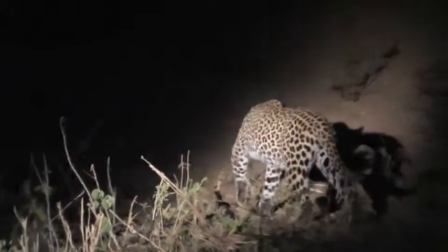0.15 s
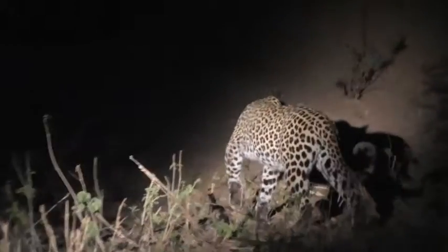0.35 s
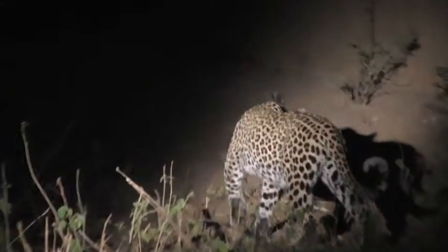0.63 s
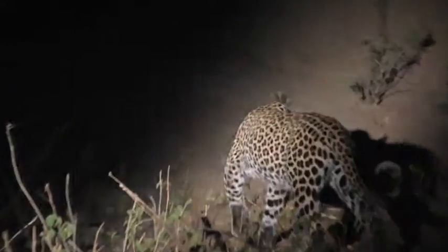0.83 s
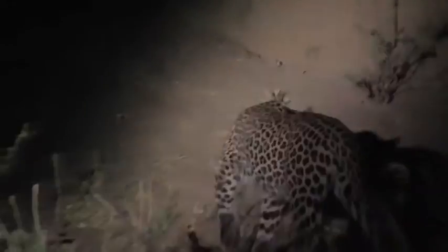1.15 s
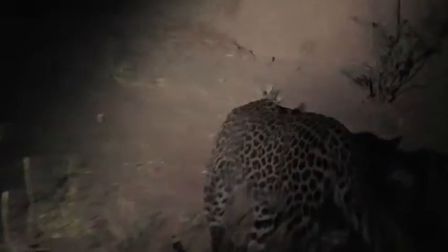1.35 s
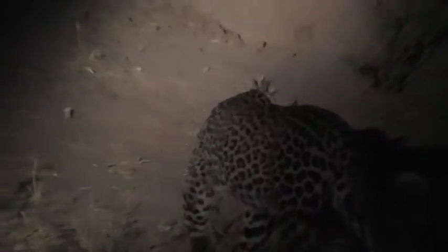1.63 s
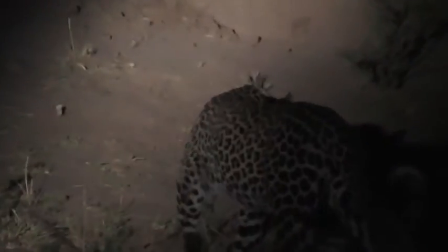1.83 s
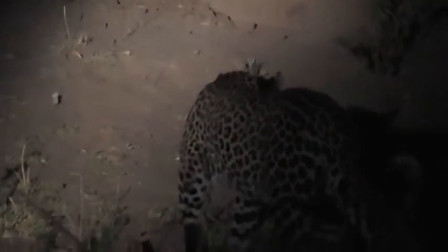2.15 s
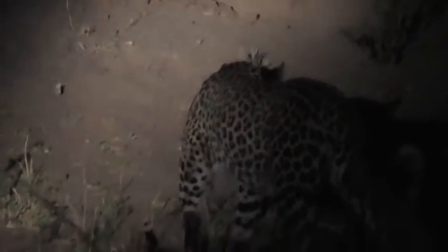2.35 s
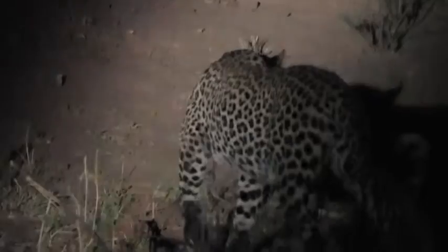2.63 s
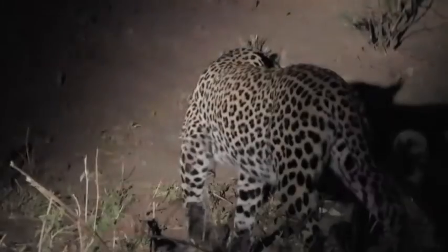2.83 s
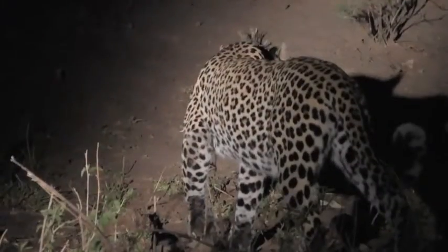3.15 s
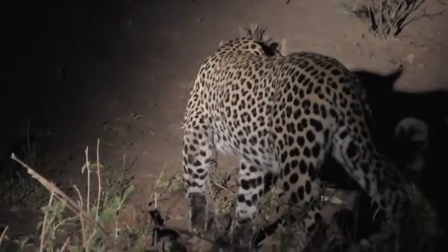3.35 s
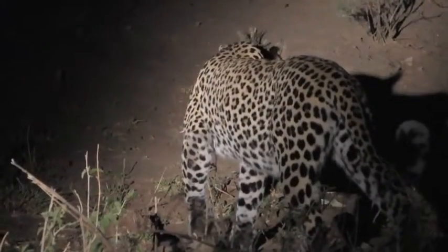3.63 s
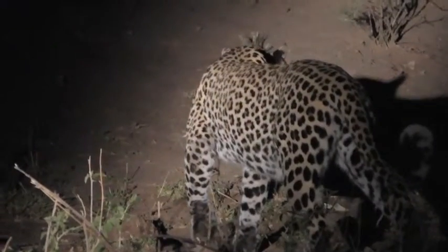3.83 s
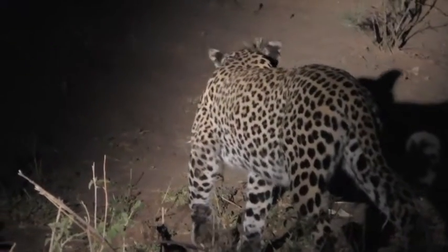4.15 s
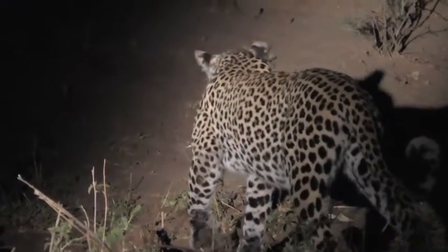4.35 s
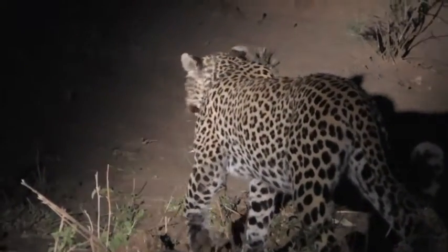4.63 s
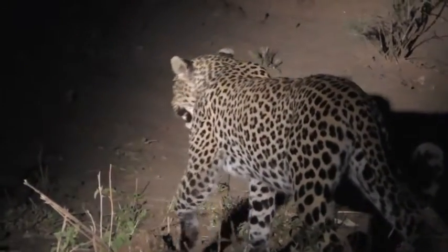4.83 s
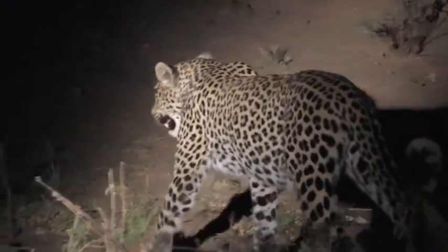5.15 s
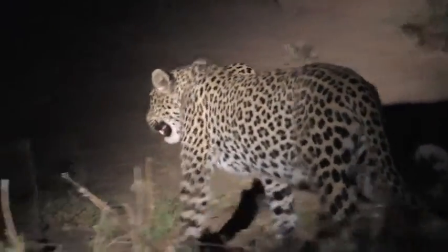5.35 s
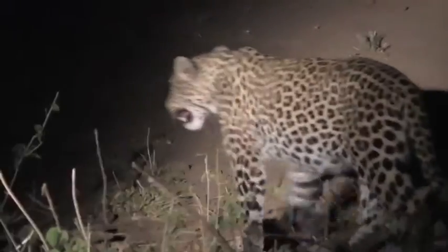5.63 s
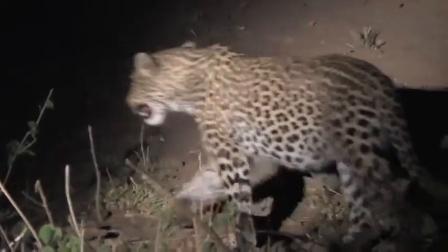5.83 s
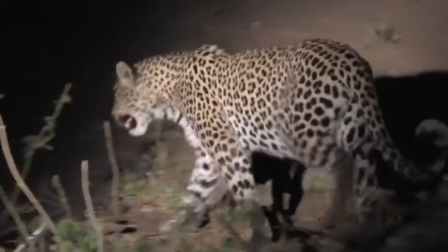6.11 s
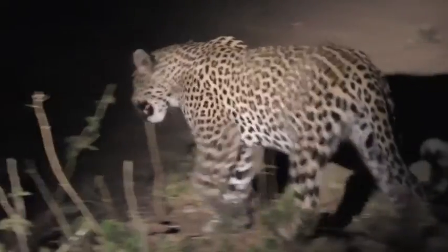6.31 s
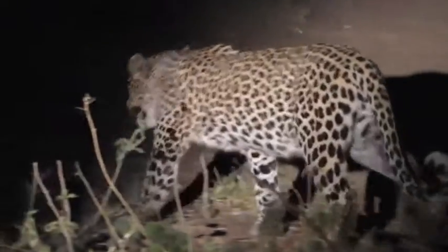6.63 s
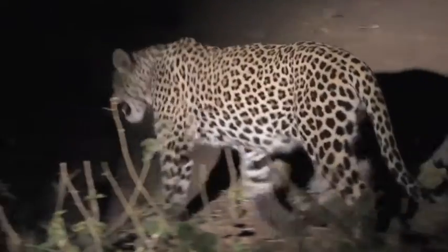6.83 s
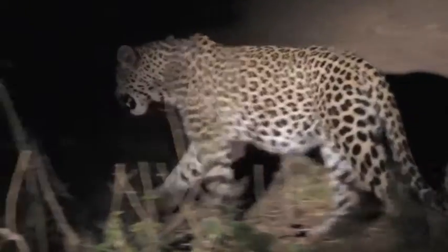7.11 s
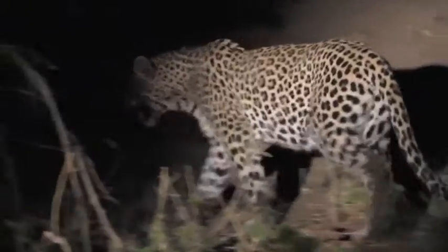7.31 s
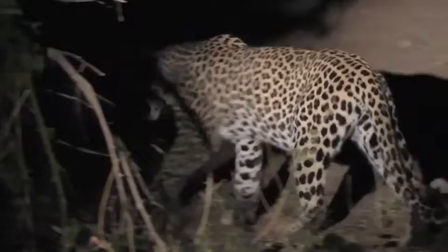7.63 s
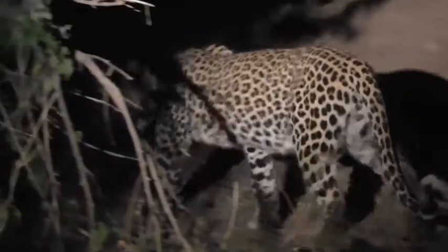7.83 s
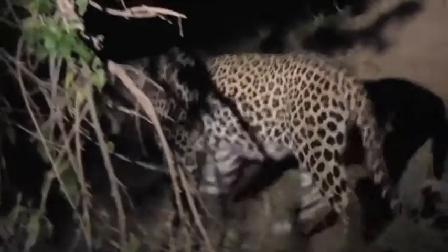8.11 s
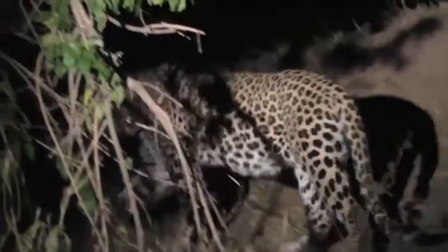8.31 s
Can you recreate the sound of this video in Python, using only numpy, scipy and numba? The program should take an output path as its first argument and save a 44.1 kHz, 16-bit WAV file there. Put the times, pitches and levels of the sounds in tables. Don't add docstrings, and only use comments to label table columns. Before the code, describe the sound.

Outdoors at night, a leopard a few metres away, slightly right of centre, alternates three deep pulsing roars with rattling drawn breaths, ending in a weak rattle and grunt by three seconds. Soft insect hiss, low traffic rumble, a faint descending bird trill and katydid buzzing surround it. A distant vehicle changes gear, then a still camera on the left fires three quick shots and one later.

```python
import sys
import numpy as np
from scipy import signal
from scipy.fft import rfft, irfft, next_fast_len
from scipy.io import wavfile
from scipy.ndimage import uniform_filter1d, map_coordinates
from numba import njit

SR = 44100
rng = np.random.default_rng(int(sys.argv[2]) if len(sys.argv) > 2 else 0)


def master_out(mix):
    frames = np.transpose(np.atleast_2d(mix))
    ceiling = np.clip(frames, -1, 1)
    pcm = np.round(ceiling * 32767).astype(np.int16)
    wavfile.write(sys.argv[1], SR, pcm)


def gain_from_db(level_db):
    decades = np.asarray(level_db, float) / 20
    return 10 ** decades


N = 373527
TIME = np.arange(N) / SR


def unit(x):
    return x / np.sqrt(np.mean(x ** 2) + 1e-20)


def levelled(x, span_s):
    return x / np.sqrt(np.abs(uniform_filter1d(x ** 2, int(span_s * SR))) + 1e-12)


def along(points, hz):
    f, v = np.transpose(points)
    return np.interp(np.log(hz + 1), np.log(f + 1), v)


def curves(rows):
    s, *columns = np.transpose(rows)
    return [np.interp(TIME, s, c) for c in columns]


def during(tables, fade_s):
    return sum(np.clip(np.minimum(TIME - t[0][0], t[-1][0] - TIME) / fade_s, 0, 1) for t in tables)


def swells(rows, rise_db, fall_db):
    gain = 0
    for start, loudest, end, db in rows:
        shape_db = np.interp(TIME, [start, loudest, end], [-rise_db, 0, -fall_db])
        gain = gain + gain_from_db(db + shape_db) * during([[[start], [end]]], .006)
    return gain


def wobble(rate):
    return map_coordinates(rng.standard_normal(int(N * rate / SR) + 4), [TIME * rate])


def phase(hz):
    return 2 * np.pi * np.cumsum(hz) / SR


def filtered(x, response):
    m = next_fast_len(N + SR // 2)
    return irfft(rfft(x, m) * response(np.fft.rfftfreq(m, 1 / SR)), m)[..., :N]


def hiss(spectrum):
    return unit(filtered(rng.standard_normal(N), lambda hz: gain_from_db(along(spectrum, hz))))


def band(hz, width_hz):
    return unit(filtered(rng.standard_normal((2, N)), lambda f: np.exp(-((f - hz) / width_hz) ** 2)))


@njit
def ringing(x, turn, keep):
    out, state = np.zeros(len(x)), 0j
    for i in range(len(x)):
        state = state * keep * np.exp(1j * turn[i]) + (1 - keep) * x[i]
        out[i] = state.real
    return out


def resonance(x, hz, width_hz):
    return 2 * ringing(x, 2 * np.pi * hz / SR, np.exp(-np.pi * width_hz / SR))


# frequency in Hz, likeness from -1 to 1.
LIKENESS = [(60, 0.068), (150, 0.58), (380, 0.25), (950, 0.18), (2380, -0.39), (5980, 1), (15000, 0.76)]


def rush(spectrum, patchy_db):
    z = signal.stft(rng.standard_normal((2, N)), nperseg=512)[2]
    field = uniform_filter1d(rng.standard_normal(z.shape[1:]), size=5, axis=0)
    field = uniform_filter1d(field, size=12, axis=1)
    pair = signal.istft(z * gain_from_db(patchy_db * unit(field)), nperseg=512)[1][:, :N]

    def mid_side(hz):
        turn = np.arccos(np.clip(along(LIKENESS, hz), -1, 1)) / 2
        return gain_from_db(along(spectrum, hz)) * [np.cos(turn), np.sin(turn)]

    mid, side = filtered(pair, mid_side)
    return unit(np.array([mid + side, mid - side]))


# time in seconds, level in dB.
TRAFFIC = [(0, -48), (2, -48.5), (3.3, -53), (4.4, -53.5), (5, -51), (8.47, -51)]
# frequency in Hz, density in dB per Hz.
RUMBLE = [(12, -29), (20, -11.5), (129, 0.5), (183, 2.5), (286, -1.5), (499, -12), (604, -20.5), (720, -12),
          (818, -48.5), (900, -45.5), (1170, -78), (1980, -120)]
# frequency in Hz, density in dB per Hz.
INSECTS = [(350, -30), (600, -32.5), (717, -14.5), (822, -4), (1670, -2), (2140, 1), (2560, -4),
           (4130, -12.5), (5430, -11), (7860, -20), (15800, -18)]
# centre in Hz, width in Hz, level in dB.
CHORUSES = [(757, 54, -78), (2150, 124, -64), (3710, 60, -79.5), (5020, 680, -66)]
# start in seconds, loudest in seconds, end in seconds, level in dB.
GRASS = (1.68, 1.715, 1.77, -52)


def night():
    traffic_db, = curves(TRAFFIC)
    rumble = gain_from_db(traffic_db + 0.9 * wobble(3.2)) * rush(RUMBLE, patchy_db=1.3)
    insects_db = -57 + 0.47 * (traffic_db - traffic_db.mean())
    insects = gain_from_db(insects_db + 0.27 * wobble(2.1)) * rush(INSECTS, patchy_db=1.83)
    choruses = sum(gain_from_db(db + .9 * wobble(3.33)) * band(hz, width) for hz, width, db in CHORUSES)
    crickets_db = -73.5 - 7 * (TIME < .7)
    crickets = gain_from_db(crickets_db + 0.48 * wobble(1.5)) * band(hz=7070, width_hz=740)[0]
    grass = swells([GRASS], rise_db=10, fall_db=38) * band(hz=8600, width_hz=3500)
    return rumble + insects + choruses + crickets + grass


# time in seconds, peak level in dB, ring in Hz.
FLAPS = [(0.009, -14, 200), (0.05, -12.5, 198), (0.471, -29, 211), (0.534, -32, 208), (0.577, -28.5, 159),
         (0.6, -22, 197), (0.649, -18, 190.5), (0.68, -16, 208), (0.711, -15.5, 193), (0.741, -11, 196),
         (0.769, -10, 204), (0.818, -17.5, 197), (1.305, -32, 224), (1.387, -23, 191), (1.437, -18, 206),
         (1.475, -15, 200), (1.51, -15.5, 189), (1.554, -12.5, 199.7), (1.588, -18.5, 197),
         (2.18, -25.5, 205.5), (2.244, -29, 195), (2.304, -21.5, 203), (2.351, -24, 197), (2.412, -25, 198),
         (2.532, -24.5, 200), (2.68, -25.5, 159), (2.709, -24, 191), (2.748, -22, 161), (2.784, -35.5, 171),
         (2.869, -38.5, 193)]


def flaps():
    rings, puffs, t = np.zeros(N), np.zeros(N), np.arange(SR // 8) / SR
    limp_s = 2.1

    def mode(hz, t60):
        return np.sin(2 * np.pi * hz * t) * gain_from_db(-60 * t / t60)

    for s, peak_db, hz in FLAPS:
        ring = gain_from_db(2.5) * mode(hz, .058) if s > limp_s else mode(hz, .105)
        ring += 0.11 * mode(1.725 * hz, 0.096) + 0.18 * mode(hz / 2, 0.13) + 0.038 * mode(2.2 * hz, 0.062)
        at = round(s * SR)
        rings[at:][:len(t)] *= np.exp(-t / 0.004)
        rings[at:][:len(t)] += gain_from_db(peak_db - 0.5) * ring * (1 - np.exp(-t / 0.0019))
        puffs[at:][:len(t)] += gain_from_db(peak_db - 60 * t / 0.064) * (1 - np.exp(-t / 0.0026))
    return rings, puffs


# start in seconds, loudest in seconds, end in seconds, level in dB.
RASPS = [
    (-.2, .04, .1, -20),
    (.56, .78, 0.89, -22.5),
    (1.36, 1.55, 1.684, -22),
    (2.0, 2.45, 2.9, -39.5),
    (2.58, 2.72, 2.83, -38),
]
# frequency in Hz, density in dB per Hz.
BREATH = [(530, -48), (900, -68.5), (1110, 14.5), (1410, -69), (1740, 1), (1930, 0), (2630, 4.5),
          (3970, -7), (4310, -32), (4960, -22), (15000, -18.5)]


def rattles():
    cycles = np.cumsum(60 * gain_from_db(3 * wobble(30))) / SR
    lumps = .25 + np.exp(-3.5 * (cycles % 1))
    noise = lumps * rng.standard_normal(N)
    throat_hz = np.full(N, 197.)

    def twice(hz, first_width, then_hz, then_width):
        return resonance(resonance(noise, hz, first_width), then_hz, then_width)

    low = levelled(twice(throat_hz, 60, throat_hz, 115), .05)
    second = gain_from_db(-22) * unit(twice(3.25 * throat_hz, 90, 3.25 * throat_hz, 150))
    chest = gain_from_db(-27.5) * unit(resonance(noise, 0.7 * throat_hz, width_hz=23))
    mouth = gain_from_db(-16) * unit(twice(1.3 * throat_hz, 45, 1.4 * throat_hz, 110))
    breath = gain_from_db(-24) * unit((lumps + 0.32) * hiss(BREATH))
    rasp = gain_from_db(-7.5) * low + chest + gain_from_db(-5.5) * (second + mouth + breath)
    rings, puffs = flaps()
    splashes = gain_from_db(-31) * puffs * unit(1.7 * second + mouth + 1.2 * breath)
    return rings + swells(RASPS, rise_db=20.5, fall_db=17.5) * rasp + splashes


# start in seconds, length in seconds, top pitch in Hz, seconds to the top pitch,
# sag of the voice there in dB.
ROARS = [
    (.128, .325, 73.04, .178, 4.5),
    (.885, 0.34, 70.9, 0.21, 3),
    (1.668, .33, 68.76, .215, 0.5),
]
# seconds after the start, first resonance in Hz,
# second resonance in Hz, strength of the second in dB.
JAW = [(-.03, 206, 603, -2), (.025, 250, 657, -2.5), (.075, 251, 672, 3), (.135, 261, 650, -3),
       (.19, 237.5, 602, 3), (.245, 208, 570, -0.5), (.3, 186, 558, -13), (.34, 168, 542, -20)]


def effort():
    rows = np.array(ROARS)
    middle = rows[:, 0] + rows[:, 1] / 2
    start, length, top_hz, top, sag_db = rows[np.abs(TIME[:, None] - middle).argmin(axis=1)].T
    t = TIME - start
    tightens = np.sin(np.pi / 2 * np.clip(t / top, 0, 1))
    lets_go = np.cos(np.pi / 2 * np.clip((t - top) / (length - top), 0, 1)) ** 1.3
    slack = .735
    pitch = top_hz * (slack + (1 - slack) * tightens * lets_go)

    def blow(lead, end):
        attack = np.clip((t + lead) / 0.037 + 0.87, 0, 1) ** 1.8
        return attack * np.clip((end - t) / 0.084 + 0.26, 0, 1) ** 1.9

    voice = blow(0, length) * gain_from_db(-sag_db * np.exp(-((t - top) / .022) ** 2))
    mouth = blow(.008, length - 0.014)
    breath_grows_db = 13 * t
    s, *jaw = np.transpose(JAW)
    return pitch, voice, mouth, breath_grows_db, *[np.interp(t, s, c) for c in jaw]


# centre in Hz, width in Hz, level in dB.
UPPER_THROAT = [(838, 65, 3.5), (1067, 153, -4.5), (1469, 26, -1.5), (1840, 37, 1), (2105, 53, 1.5),
                (2395, 40, -2), (2694, 160, -10), (3050, 180, -11.5), (3800, 470, -21.5),
                (7740, 14000, -42)]


def upper_throat(x):
    out = 0
    for k, (c, w, db) in enumerate(UPPER_THROAT):
        mode = filtered(x, lambda f: 1j * f * w / (c * c - f * f + 1j * f * w))
        out = out + (-1) ** k * gain_from_db(db + 1.7 * wobble(25)) * mode
    return out


def roars():
    pitch, voice, mouth, grows_db, first_hz, second_hz, second_db = effort()
    cycles = np.cumsum(pitch * (1 + .014 * wobble(50))) / SR
    size = gain_from_db(1.5 * rng.standard_normal(int(cycles[-1]) + 1))[cycles.astype(int)]
    pulses = unit(np.diff(np.floor(cycles), prepend=0) * size)
    air = unit((1 + 0.75 * np.cos(2 * np.pi * (cycles - .15))) * rng.standard_normal(N))
    source = pulses + .18 * air
    first = source
    for width_hz in (68.5, 81, 320):
        first = resonance(first, first_hz, width_hz)
    skirt = gain_from_db(-30) * resonance(source, 1.3 * first_hz, width_hz=60)
    second = resonance(resonance(pulses + .4 * air, second_hz, width_hz=75), second_hz, width_hz=140)
    breath = unit(gain_from_db(1.8 * wobble(60)) * upper_throat(air + .16 * pulses))
    bright = gain_from_db(-18.5 + second_db) * levelled(second, 0.095) + gain_from_db(-26 + grows_db) * breath
    return gain_from_db(-20) * (voice * levelled(first + skirt, 0.035) + mouth * bright)


# time in seconds, pitch in Hz, level in dB.
TRILL = [(1.1, 3300, -72), (1.22, 3230, -53), (1.35, 3110, -65), (1.8, 2976, -56), (2.07, 2770, -53),
         (2.3, 2520, -51.5), (2.45, 2340, -54), (2.5, 2260, -55), (2.7, 2150, -74)]
# time in seconds, pitch in Hz, level in dB.
WHISTLE = [(.135, 3780, -71), (.155, 3350, -58), (.18, 3050, -57), (.21, 2770, -58.5)]


def birds():
    hz, db = curves(TRILL)
    beat = ((TIME - 2.072) * 13.8 + .5) % 1 - .5
    notes = np.exp(-(beat / .15) ** 2)
    dipping_hz = hz * (1 + 0.19 * np.abs(beat) - .02)
    trill = gain_from_db(db + 2.2 * wobble(83)) * notes * np.sin(phase(dipping_hz))
    hz, db = curves(WHISTLE)
    whistle = gain_from_db(db) * np.sin(phase(hz))
    return during([TRILL], 0.031) * trill + during([WHISTLE], .01) * whistle


# start in seconds, loudest in seconds, end in seconds, level in dB.
LONG_BUZZ = (1.2, 2.5, 2.9, -61.5)
# start in seconds, loudest in seconds, end in seconds, level in dB.
CHIRPS = [
    (2.97, 3.06, 3.11, -63.5),
    (3.19, 3.24, 3.4, -63),
    (3.72, 3.86, 3.92, -63.5),
    (4.3, 4.34, 4.38, -68),
    (4.39, 4.45, 4.49, -62.5),
]


def katydid():
    tires_s, slurs_s = 2.5, 2.93
    rate = np.where(TIME < slurs_s, 22.4 - 10 * np.clip(TIME - tires_s, 0, None), 22.4)
    blur = np.where(TIME < slurs_s, .35 + .6 * np.exp(-((TIME - tires_s) / .1) ** 2), 1.5)
    count = np.cumsum(rate) / SR
    strokes = blur + np.cos(np.pi * (count - count[round(2.005 * SR)])) ** 4
    strokes = strokes / np.sqrt(blur ** 2 + .75 * blur + 0.27)
    wing = [(9500, -24), (11300, -1), (12900, 6), (14400, -1), (16000, -11)]  # Hz, dB per Hz
    gain = swells([LONG_BUZZ], rise_db=13, fall_db=7) + swells(CHIRPS, rise_db=7, fall_db=6)
    return gain * gain_from_db(1.5) * strokes * np.array([hiss(wing), hiss(wing)])


# time in seconds, firing rate in Hz, level in dB, overtones in dB.
ENGINE = [(2.8, 93.26, -62.5, -2), (3.85, 92.07, -64.5, 8.5), (4, 89.9, -53, -7.5), (4.22, 80, -51.5, -4),
          (4.3, 75.6, -67, -23), (4.58, 71.94, -63, -22), (4.7, 81, -54, -16), (4.9, 92.3, -54.5, -3.5),
          (5.2, 102.7, -63.5, 4), (5.6, 118.7, -55, -1.5), (6, 126.5, -52, -19), (6.75, 140.9, -52.5, -10),
          (7, 136.5, -57, -11), (7.25, 138, -48, -6.5), (7.5, 147.6, -49, -13), (7.75, 138.2, -57.5, 3),
          (7.95, 136.3, -50, -10.5), (8.47, 142.3, -52, -19)]
# frequency in Hz, gain in dB.
EXHAUST = [(150, 4), (280, -1), (420, -16)]


def vehicle():
    hz, load_db, over_db = curves(ENGINE)
    turn = phase(hz * (1 + 0.0067 * wobble(9.1)))

    def order(k, db):
        return gain_from_db(load_db + db + 2.2 * wobble(9)) * np.sin(k * turn)

    tones = order(1, 0.5)
    tones += order(1.5, -9) * (hz > 115)
    tones += sum(order(k, over_db + along(EXHAUST, k * hz)) for k in (2, 3))
    return tones * np.clip((TIME - 2) / 0.79, 0, 1)


# start in seconds, wait from opening to closing in seconds.
SHOTS = [
    (5.3638, 0.078),
    (5.5897, 0.078),
    (5.8169, .077),
    (7.2262, 0.11),
]
# peak in seconds, bright level in dB, low level in dB,
# rise in seconds, t60 in seconds.
OPENING = [
    (.001, -38, -35.5, 0.00096, 0.021),
    (.004, -41, -38.5, 0.0018, 0.083),
    (.013, -35, -45, 0.0018, 0.015),
    (.023, -26, -44, 0.0017, 0.04),
    (0.027, -55, -32.5, .002, 0.029),
    (0.052, -43.5, -51, .002, 0.068),
    (.062, -54.5, -40.5, 0.0023, 0.039),
]
CLOSING = [
    (.001, -57, -49.5, .001, .03),
    (.006, -37, -47, .002, .03),
    (.010, -48, -34, .002, 0.022),
    (.017, -42, -40, 0.0034, .03),
    (0.021, -27, -44.5, 0.0039, 0.045),
    (.036, -25, -31.5, .0015, 0.019),
    (.040, -25, -35, 0.0042, .04),
    (0.053, -38.5, -39.5, 0.0018, 0.031),
    (.077, -44, -48, 0.0029, 0.066),
    (.091, -52, -46.5, 0.0016, 0.025),
]
# frequency in Hz, density in dB per Hz.
BODY = [(290, -28.5), (500, -11), (553, -24), (794, -23), (1000, -8), (1660, -7.5), (1890, -0.5),
        (2420, -13), (2670, -8.5), (5050, -4), (7240, -3), (13700, -7.5), (15800, -10)]
# frequency in Hz, left minus right in dB.
BODY_SIDE = [(60, 0.0), (150, 0.5), (380, -2), (950, 5), (2380, 13.5), (5980, 1.5), (15000, 5.5)]


def camera():
    bright, low, t = np.zeros(N), np.zeros(N), np.arange(-SR // 100, SR // 8) / SR
    for start, wait in SHOTS:
        closing = [(row[0] + wait, *row[1:]) for row in CLOSING]
        for s, bright_db, low_db, rise, t60 in OPENING + closing:
            decay = 0.99 * gain_from_db(-60 * t / t60) + 0.084 * gain_from_db(-60 * t / 0.19)
            blow = np.where(t < 0, np.exp(-(t / rise) ** 2), decay)
            at = round((start + s + t[0]) * SR)
            scatter_db = rng.normal(0, 1, 2)
            bright[at:][:len(t)] += (gain_from_db(bright_db + scatter_db[0] - 5.5) * blow) ** 2
            low[at:][:len(t)] += (gain_from_db(low_db + scatter_db[1] + 3.5) * blow) ** 2
    grain = gain_from_db(1.3 * wobble(700)) * (rng.standard_normal(N) + 0.53 * rng.standard_normal((2, N)))
    norm = np.sqrt(np.mean(gain_from_db(2 * along(BODY, np.linspace(0, SR / 2, 999)))))

    def colour(hz):
        return gain_from_db(along(BODY, hz) + np.outer([.5, -.5], along(BODY_SIDE, hz))) / norm

    def heavy(hz):
        return 1 / (1 + (hz / 3700) ** 4)

    thuds = filtered(np.sqrt(low) * grain, lambda hz: colour(hz) * heavy(hz))
    clicks = filtered(np.sqrt(bright) * grain, lambda hz: colour(hz) * (1 - heavy(hz)))
    return thuds + clicks


# frequency in Hz, t60 in seconds.
ECHOES = [(150, 0.41), (1000, .3), (8000, 0.044)]


def bush(x):
    hz, t, z = signal.stft(rng.standard_normal((2, SR // 2)), SR, nperseg=256)
    tail = signal.istft(z * gain_from_db(-60 * t / along(ECHOES, hz)[:, None]), SR, nperseg=256)[1]
    late = np.pad(np.atleast_2d(x), ((0, 0), (500, 0)))
    return signal.fftconvolve(late, tail / np.linalg.norm(tail[0]), axes=1)[:, :N]


# frequency in Hz, lead of the left in radians.
PORTS = [(0, -0.065), (260, -0.45), (1640, 0.48), (3960, -0.16), (4740, 0.5), (5770, 0.0), (16000, -0.0)]


def scene():
    cat, still, far = roars() + rattles(), camera(), birds()

    def head(hz):
        return (1j * hz / 110) ** 2 / (1 + 1.3j * hz / 110 - (hz / 110) ** 2)

    cat = filtered(cat, head)
    sides = filtered(cat, lambda hz: np.exp(np.outer([.5j, -.5j], along(PORTS, hz))))
    near = sides * gain_from_db([[-.9], [.9]]) + gain_from_db(-25) * bush(cat)
    near += still + gain_from_db(-15) * bush(still)
    distant = vehicle() * gain_from_db([[.4], [-.4]])
    distant = distant + far * gain_from_db([[1.5], [-1.5]]) + gain_from_db(-9) * bush(far)
    return near + distant + katydid() + night()


def roll_off(x):
    return signal.sosfilt(signal.butter(12, 16490, fs=SR, output="sos"), x)


def record(dry):
    mix = filtered(dry, lambda hz: hz < 15830)
    return roll_off(mix)


dry = scene()
out = record(dry)
master_out(out)
```